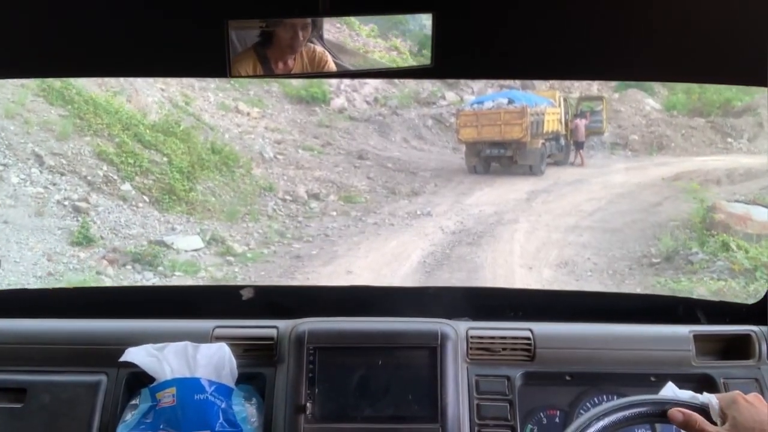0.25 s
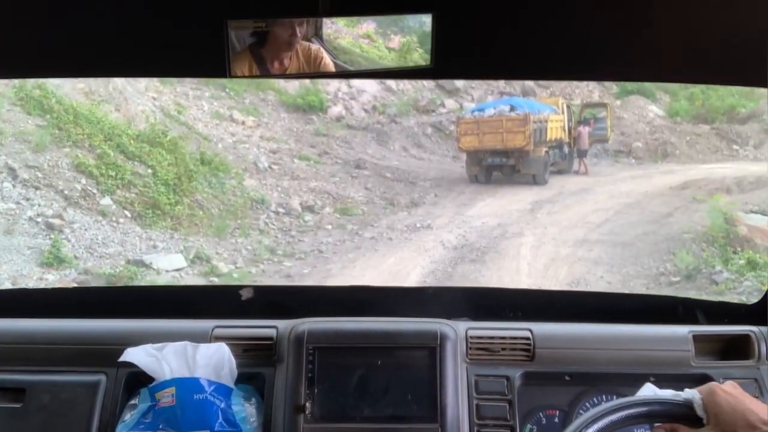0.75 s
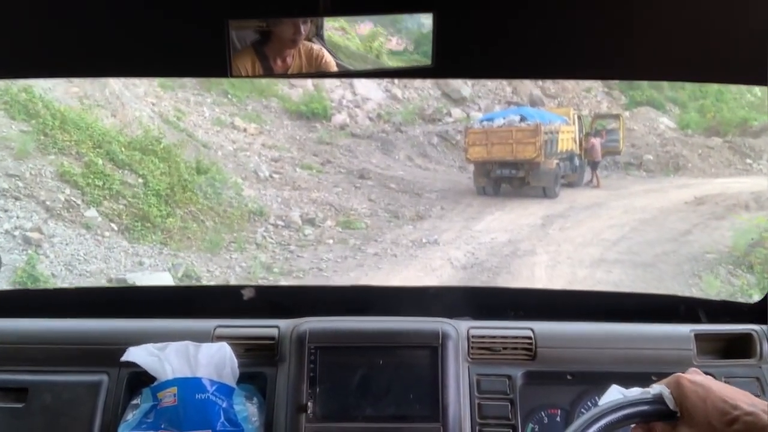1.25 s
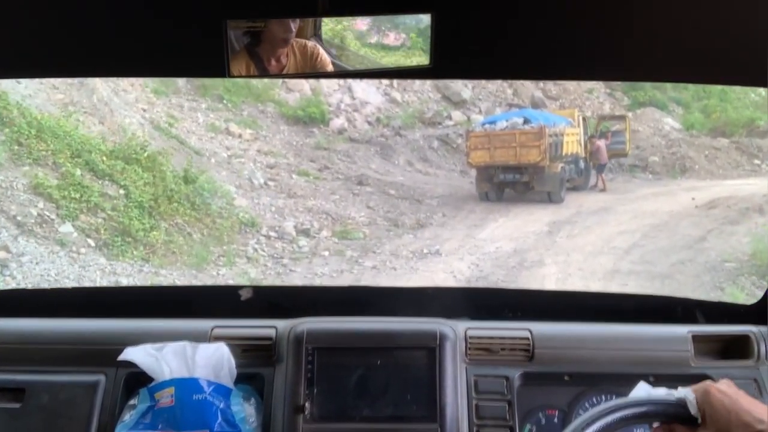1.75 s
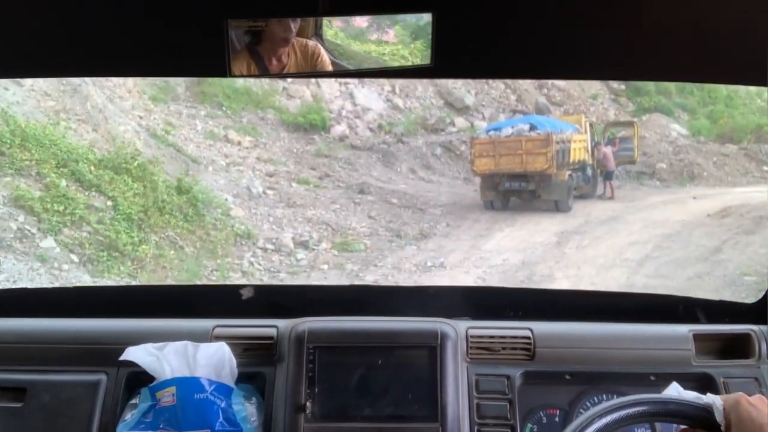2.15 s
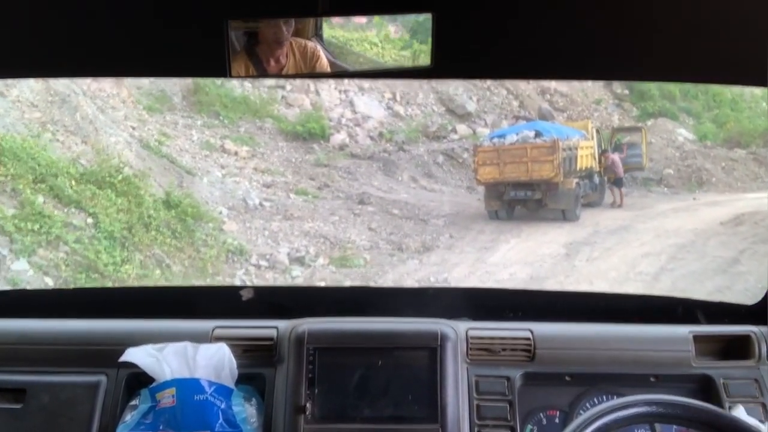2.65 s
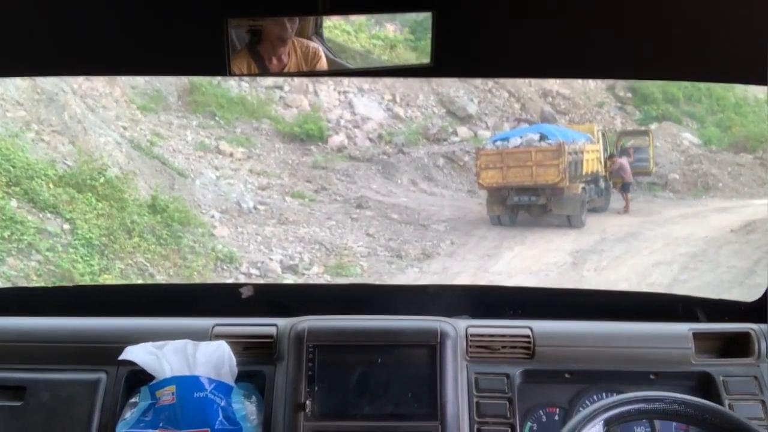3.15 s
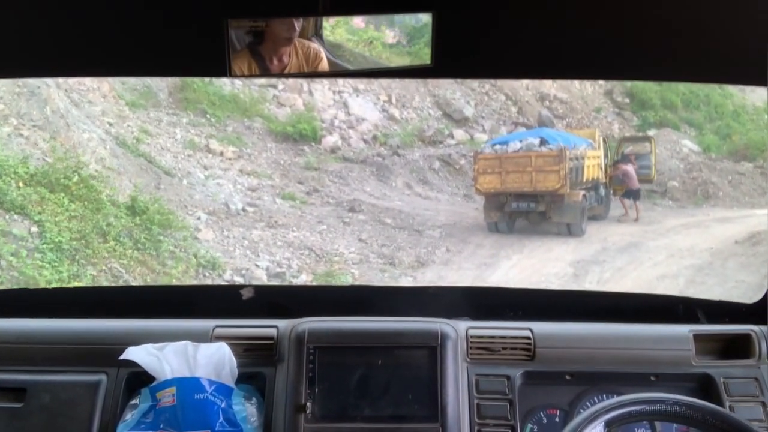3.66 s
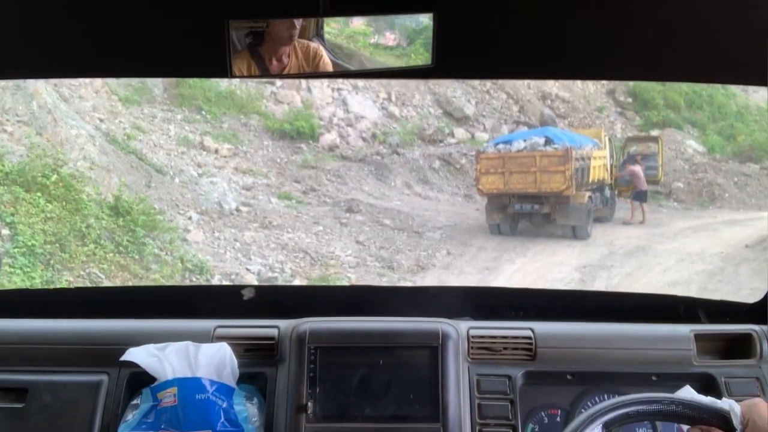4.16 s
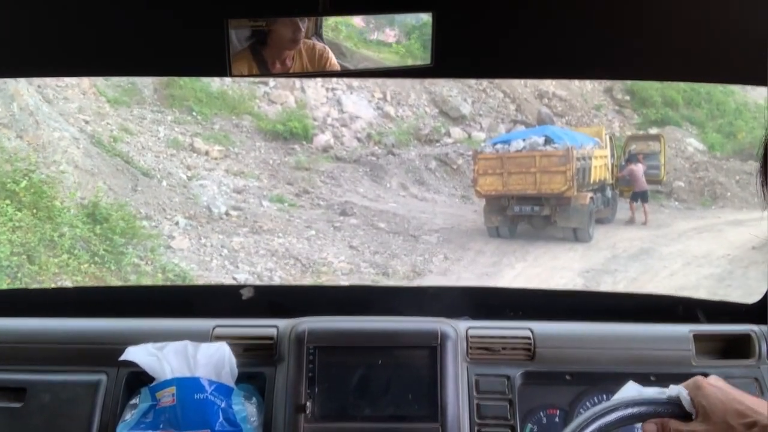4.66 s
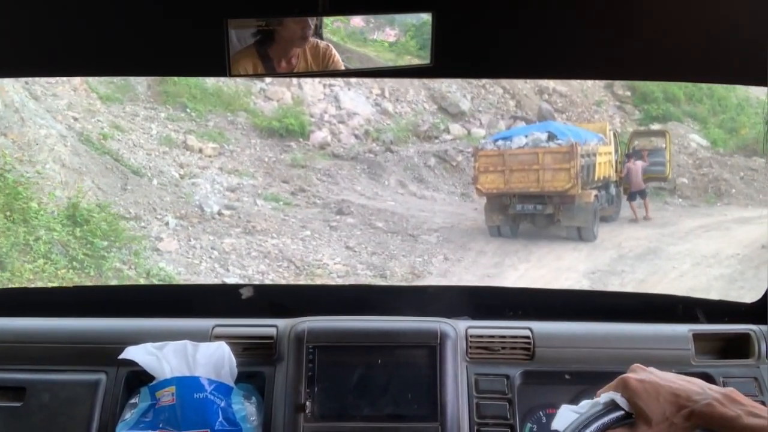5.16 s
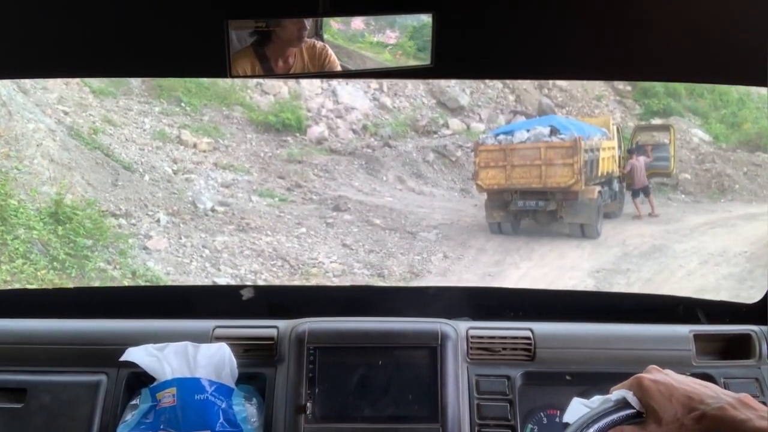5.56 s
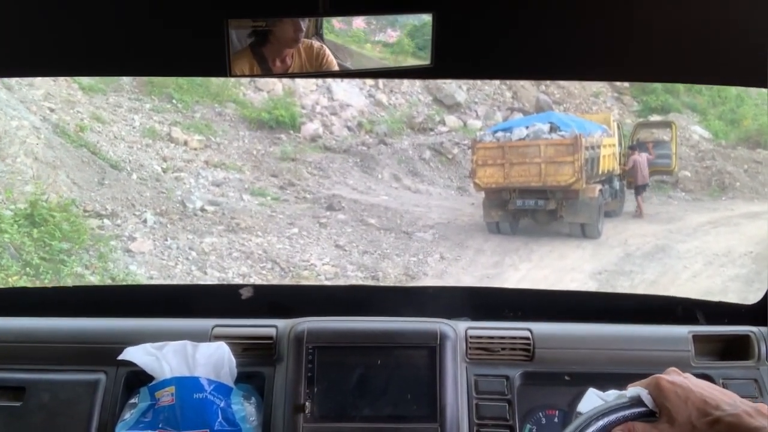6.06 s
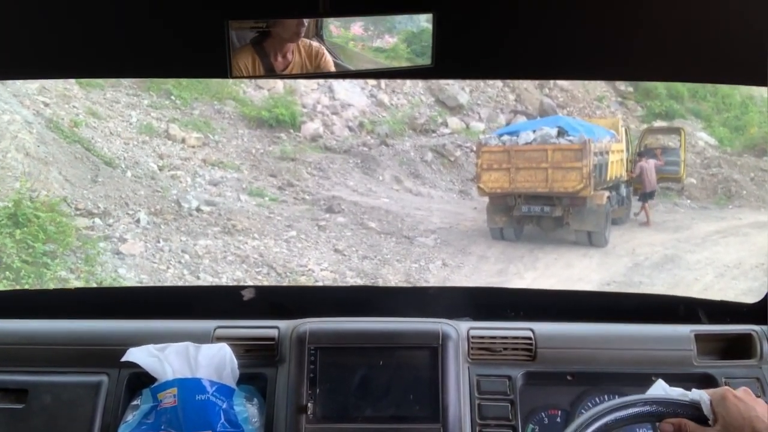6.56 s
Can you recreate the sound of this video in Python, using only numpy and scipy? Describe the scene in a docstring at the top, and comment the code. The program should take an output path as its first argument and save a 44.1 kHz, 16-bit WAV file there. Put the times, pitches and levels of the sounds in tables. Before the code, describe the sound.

A heavy diesel truck is heard from inside its cab, creeping along a dirt road. For the first 3 seconds the engine pulls at low revs with a deep, booming drone, wavering slightly in pitch. Road rumble and diesel clatter run beneath it, cab panels hum, and very faint puffs of air pulse with the engine. Loose trim knocks and rattles irregularly throughout, with clusters around 1.1 to 1.6 seconds and 2 to 3 seconds. From about 3 seconds the load eases, the panel hum fades and the revs drop in steps, a little quieter. Faint plastic squeaks come near 4 and 5.5 seconds, and a thin ring repeats about seven times a second from 3.7 to 6.1 seconds. The cab booms again around 4.5 and 5.3 seconds. The engine then runs near idle, with more trim knocks from 6.2 seconds until the end, just before 7.

```python
"""A heavy four-cylinder diesel truck, heard from inside the cab, creeps down a dirt road and slows to idle.
Multiples of the firing rate boom in the cab; road rumble and diesel clatter fill the middle.
Loose trim knocks and squeaks on the bumps, and a faint puff of air comes once an engine cycle.
The microphone is a phone in the cab. Left and right are alike in the bass and looser in the middle;
the treble is alternately in and out of phase."""
import sys
import numpy as np
from scipy import signal
from scipy.fft import rfft, irfft, next_fast_len
from scipy.io import wavfile
from scipy.ndimage import uniform_filter1d

SR = 44100
rng = np.random.default_rng(int(sys.argv[2]) if len(sys.argv) > 2 else 0)


def dump_mix(stems):
    """Bounce the given channels to the path in sys.argv[1] as a 16-bit WAV at rate SR."""
    frames = np.atleast_2d(stems).T  # one column per channel
    limited = np.clip(frames, -1, 1)  # hard clip at full scale
    pcm = np.round(limited * 32767).astype(np.int16)
    wavfile.write(sys.argv[1], SR, pcm)


N = 300321
T = np.arange(N) / SR
FFT_SIZE = next_fast_len(N, True)
BIN_HZ = np.arange(FFT_SIZE // 2 + 1) * SR / FFT_SIZE + 1e-3

# engine slowing to idle: time_s, firing_hz
FIRING_RATE = [(0, 36.2), (.25, 35.3), (.8, 37.9), (1.3, 37.8), (2, 35), (2.5, 35.9), (2.75, 36.9),
               (2.95, 35.8), (3.1, 32.2), (3.3, 31.6), (3.75, 31.6), (4.25, 28.3), (4.9, 28.4), (5.1, 25.8),
               (5.25, 24.3), (5.4, 23.7), (5.6, 24), (5.85, 25.4), (6.3, 25), (6.81, 22.5)]
# steady drone, by multiple of the firing rate: loaded_db, unloaded_db
DRONE_LEVELS = {1: (-26.5, -34.5), 2: (-36.5, -36), 3: (-38, -40), 4: (-45, -42), 8: (-54.5, -39),
                12: (-53, -56)}
# cab booms, by multiple of the firing rate: middle_s, hold_s, level_db
CAB_BOOMS = {1: [(.25, 0.078, -21.5), (.8, .3, -24.5), (1.5, 0.12, -22), (2.1, .45, -20), (2.5, .2, -21.5),
             (3.15, 0.34, -29), (3.5, .15, -32), (3.85, 0.27, -27.5), (4.9, 0.17, -28), (5.8, 0.09, -30)],
             2: [(.02, 0.048, -22.5), (1.15, .7, -27.5), (2.7, 0.18, -30), (3.92, 0.23, -29.5),
             (4.4, 0.18, -33.5), (5.325, .02, -18.5), (5.6, 0.057, -27.5), (5.83, 0.081, -33),
             (6.5, 0.32, -28)], 3: [(.15, 0.33, -29), (.95, 0.44, -29), (1.7, .45, -30.5), (2.2, 0.25, -35),
             (5.98, .1, -35), (6.1, 0.04, -29), (6.75, 0.11, -30.5)], 4: [(.3, 0.22, -40.5),
             (2.2, 0.23, -37), (2.75, 0.41, -37), (5.2, 0.17, -35), (4.3, 0.086, -30.5),
             (4.45, 0.18, -22.5), (4.62, 0.058, -31.5), (4.77, .16, -23.5), (5.9, 0.22, -33)],
             8: [(3.2, 0.21, -36.5), (4.65, 0.49, -38), (5.1, 0.048, -32), (5.5, 0.15, -34),
             (5.61, .03, -34), (5.725, 0.05, -27.5), (5.83, 0.049, -36), (5.925, 0.043, -27),
             (6.04, 0.12, -37.5), (6.22, 0.0036, -24)], 12: [(2.5, .1, -41.5), (5.3, 0.094, -45),
             (5.5, 0.13, -39), (5.64, .05, -42), (5.77, 0.12, -36.5), (6.33, 0.1, -44.5)]}
# two cab panels humming under load: time_s, pitch_hz, level_db
LOW_PANEL_HUM = [(0, 206.7, -40.5), (.35, 196, -34.5), (.62, 201.9, -33.5), (.9, 192.9, -40),
                 (1.2, 191.5, -36.5), (1.9, 209.3, -39.5), (2.45, 214.5, -40), (2.7, 210, -51)]
HIGH_PANEL_HUM = [(0, 300, -38.5), (.3, 294, -31.5), (.52, 303, -32.5), (.68, 306.3, -47.5),
                  (1.55, 300.8, -48), (1.7, 300, -38), (1.87, 299, -51), (2.1, 295.9, -39),
                  (2.4, 297.8, -45), (2.65, 292.2, -35), (3, 287, -36.5)]
# shaking of the cab by road and engine: time_s, rumble_db, rattle_db
CAB_SHAKE = [(0, -22.5, -44.5), (.1, -24.5, -45), (.2, -24, -45), (.3, -24.5, -43.5), (.45, -25.5, -45.5),
             (.6, -26, -46), (.8, -25.5, -48), (1.05, -26, -44.5), (1.14, -24, -44), (1.22, -22, -45.5),
             (1.3, -23, -39.5), (1.38, -24, -44.5), (1.52, -21, -45), (1.85, -27.5, -47), (2.1, -26, -46),
             (2.6, -24, -44.5), (2.95, -25.5, -46.5), (3.3, -29, -49), (3.6, -26.5, -46.5),
             (3.75, -27, -42.5), (4.05, -27.5, -46.5), (4.3, -27, -47.5), (5.2, -30, -48.5),
             (5.45, -27.5, -47), (5.7, -27.5, -46.5), (6.17, -29, -49), (6.24, -25, -46), (6.32, -29, -51),
             (6.63, -27.5, -43.5), (6.76, -24.5, -50), (6.81, -21.5, -45)]
# cab resonances: pitch_hz, width_hz, lift_db
CAB_MODES = [(47.6, 8.8, 7), (67, 8.7, 5.5), (76.6, 10, 6.5), (118.4, 27, 7.5), (147, 20, 6), (203, 24, 8),
             (293, 19, 7), (502, 9.1, 3), (830, 20, 7), (1087, 110, 7.5), (1465, 6.9, 5.5), (1950, 40, 6),
             (2235, 40, 2.5), (3330, 18, 2.5), (4230, 31, 5), (4760, 70, 4)]
# spectra of the noises in the cab: frequency_hz, gain_db
RUMBLE_SPECTRUM = [(15, -30), (24, -17), (33, -5.5), (50, 1.5), (75, -3), (92, -8), (170, -12),
                   (260, -14.5), (420, -29), (800, -54.5)]
CLATTER_SPECTRUM = [(150, -12), (330, -1), (500, -0.5), (700, -4.5), (1000, -13.5), (1500, -14),
                    (2500, -25), (5000, -49.5)]
RATTLE_SPECTRUM = [(700, -7.5), (1400, -0.5), (2200, -2), (3300, -5.5), (5000, -12), (7000, -15),
                   (10000, -35.5)]
HISS_SPECTRUM = [(3000, -14), (6000, 0), (8300, 2), (10500, -2), (11800, -6), (13000, -5.5), (15500, -5.5)]
PUFF_SPECTRUM = [(6000, -22), (9000, -8), (11000, 0), (11900, -6), (13000, 0), (15500, -3)]
# loose trim on bumps, rough peak of each mode group: time_s, low_db, middle_db, high_db
TRIM_KNOCKS = [(.105, -28, -31, -43), (.309, -42, -35, -46), (.829, -29.5, -41, -46),
               (1.106, -30, -31, -41), (1.128, -26.5, -31, -39), (1.155, -31, -39, -45),
               (1.175, -42, -43, -44), (1.261, -36, -34, -42), (1.284, -37, -27.5, -40),
               (1.302, -35, -28.5, -43.5), (1.316, -40, -37, -49), (1.533, -24.5, -30.5, -35),
               (1.556, -28, -37, -45), (1.683, -28.5, -36.5, -46), (2.075, -26, -38, -48),
               (2.098, -25, -39, -45), (2.125, -32, -40, -47), (2.15, -27, -39, -47),
               (2.185, -28.5, -38, -45), (2.255, -27.5, -45, -41), (2.441, -22, -42, -42.5),
               (2.471, -27.5, -45, -44), (2.5, -29, -46, -49), (2.529, -21, -31, -35),
               (2.559, -22.5, -48, -50), (2.575, -28.5, -48, -44), (2.617, -30, -42, -47),
               (2.76, -44, -28, -38.5), (2.811, -21, -37, -48), (2.839, -27.5, -37.5, -53),
               (2.872, -25.5, -41, -50), (2.909, -31.5, -41, -48), (3.02, -33, -36.5, -47),
               (3.303, -30.5, -37, -44.5), (3.709, -37, -42, -38), (3.739, -38, -45, -41.5),
               (3.804, -32.5, -40, -39), (3.959, -34.5, -37, -41), (4.478, -25.5, -35, -49),
               (5.269, -39, -42, -44.5), (5.399, -38, -46, -44), (5.42, -40, -42, -42.5),
               (5.443, -30.5, -40, -49.5), (5.479, -37, -40, -43), (5.827, -32.5, -37.5, -43.5),
               (6.098, -35, -42, -45), (6.208, -29, -41, -43), (6.228, -30, -36, -44),
               (6.249, -33, -40, -45), (6.279, -37, -39, -46), (6.37, -33, -40, -44),
               (6.419, -37, -45, -47), (6.436, -29.5, -45, -43), (6.47, -33, -42, -42),
               (6.492, -34, -41, -47), (6.557, -29, -37, -50), (6.612, -31, -35, -43),
               (6.635, -34.5, -40, -49), (6.685, -35, -38, -49), (6.721, -30.5, -36.5, -47),
               (6.779, -35, -37, -35)]
# trim modes in low, middle and high groups: pitch_hz, t60_s, gain_db
TRIM_MODES = [
    [(640, .04, -5), (740, .05, -3), (830, .07, 0), (910, .07, -1), (990, .06, -2), (1065, .06, -3),
     (1170, .035, -7)],
    [(1420, .04, -2), (1540, .03, -4), (1660, .03, -4), (1790, .05, 0), (1960, .045, 0), (2200, .035, -2),
     (2410, .035, 0), (2610, .028, -1), (2800, .022, -2)],
    [(3050, .022, -1), (3350, .028, 0), (3540, .028, 0), (3750, .022, -1), (3960, .022, -1),
     (4200, .028, -1), (4550, .025, -1), (4800, .025, -3), (5100, .015, -2), (5500, .012, -2),
     (6100, .008, -2)],
]
# cab shell modes: pitch_hz, t60_s, gain_db
SHELL_MODES = [(290, .05, 0), (340, .045, 0), (395, .045, 0), (445, .05, 0), (505, .05, 0), (560, .035, 0)]
# rubbing plastic: middle_s, pitch_hz, width_hz, level_db, half_length_s
PLASTIC_SQUEAKS = [(3.97, 2200, 45, -48, .06), (3.8, 2220, 60, -54, .1), (1.115, 2410, 60, -47, .015),
                   (1.128, 3350, 70, -50, .015), (1.165, 3540, 70, -49, .018), (3.92, 2850, 70, -55, .03),
                   (2.565, 6300, 140, -58, .008), (4.283, 4250, 600, -50, .013), (5.46, 900, 60, -43, .045),
                   (5.44, 3800, 700, -52, .05), (5.49, 2830, 60, -54, .035)]
# longer hisses of air: peak_s, level_db, rise_s, fall_s
AIR_HISSES = [(.03, -56.5, 0.055, 0.44), (2.55, -57, .12, .12), (3.73, -56, 0.034, .08),
              (3.86, -55.5, 0.054, 0.082), (5.19, -58, .03, 0.045), (5.83, -57.5, 0.036, 0.098),
              (6.22, -57, 0.0089, .05), (6.55, -55, 0.066, 0.089), (6.785, -45, 0.0066, .04)]
# a narrow ring that repeats near idle: peak_s, level_db
IDLE_RINGS = [(3.67, -56), (3.82, -48), (3.96, -45), (4.07, -48), (4.21, -44.5), (4.36, -51), (4.5, -46),
              (4.655, -47), (4.8, -49), (4.945, -50), (5.11, -52), (5.27, -57), (5.45, -53), (5.64, -49),
              (5.83, -51), (6.01, -55), (6.13, -52)]
# how alike left and right sound at each pitch, the treble alternately in and out of phase:
# frequency_hz, likeness (0-1), right_lead_rad, left_minus_right_db
STEREO_IMAGE = [(20, .99, 0, 3.5), (70, .9, 0, 3.5), (130, .88, 0, 3), (260, .6, 0, 2.3), (450, .3, .2, 2),
                (650, .35, 2.9, 2), (1400, .45, 2.6, 1.5), (2000, .4, 3.6, 3), (4100, .3, 6.3, 2),
                (6000, .4, 7.9, .5), (7000, .75, 8.9, 0), (7700, 1, 3 * np.pi, 0), (9000, 1, 3 * np.pi, 0),
                (10300, .75, 11, 0), (11700, 1, 4 * np.pi, 0), (13100, 1, 4 * np.pi, 0),
                (14300, .65, 14, 0), (15300, 1, 5 * np.pi, 0)]

LIFT_OFF_S, LIFT_OFF_EASE_S = 3.47, 0.61  # the engine load falls away around this moment
CLATTER_DB, HISS_DB, PUFF_DB = (-33, -37.5), (-61.5, -61), (-55, -72.5)  # loaded, unloaded


def engine_drone():
    """Multiples of the firing rate hold a steady level and swell for a while as the cab booms."""
    firing_hz = curves(FIRING_RATE)[0]
    fade_s, out = 0.034, 0
    for order, steady_db in DRONE_LEVELS.items():
        boom = 0
        for middle, hold, db in CAB_BOOMS[order]:
            outside_s = np.maximum(np.abs(T - middle) - hold / 2, 0)
            boom += undb(db) * np.exp(-(outside_s / fade_s) ** 2)
        level = np.maximum(undb(by_load(steady_db)), boom)
        out += level * tone(order * firing_hz, 0, waver_db=1.6)
    return out


def panel_hums():
    """Two cab panels hum under load, each fading over its last tenth of a second."""
    return sum(tone(*curves(hum), waver_db=2.5) * np.clip((hum[-1][0] - T) * 10, 0, 1)
               for hum in (LOW_PANEL_HUM, HIGH_PANEL_HUM))


def cab_shaking():
    """Road rumble, diesel clatter and grainy rattle sound through the cab modes, over a thin hiss."""
    rumble_db, rattle_db = curves(CAB_SHAKE)
    swing_db = rattle_db - rattle_db.mean()  # clatter and hiss partly follow the rattle
    cab = np.sqrt(1 + sum((undb(db) ** 2 - 1) * resonance(hz, width) ** 2 for hz, width, db in CAB_MODES))
    pulses = 1 + 0.42 * np.exp(-(firing_count() % 1) / 0.11)  # a kick at each firing
    shudder = walk(20)
    grains = undb(0.56 * uniform_filter1d(rng.exponential(size=N), 60) * np.sqrt(60))
    rumble = undb(rumble_db + 2 * walk(8)) * colour(noise(), cab * gains(RUMBLE_SPECTRUM))
    clatter = flicker(pulses * noise(), cab * gains(CLATTER_SPECTRUM), 0.53 * shudder, own_db=2.06)
    clatter *= undb(by_load(CLATTER_DB) + 0.44 * swing_db)
    rattle = flicker(pulses * grains * noise(), cab * gains(RATTLE_SPECTRUM), 1.4 * shudder, own_db=1.0)
    rattle *= undb(rattle_db)
    hiss_db = by_load(HISS_DB) + .5 * swing_db + 0.95 * shudder + 1.1 * walk(10)
    hiss = undb(hiss_db) * colour(noise(), gains(HISS_SPECTRUM))
    return rumble + clatter + rattle + hiss


def trim_knocks():
    """Each knock is a short chatter that rings the trim and the cab shell, with a new mix of modes."""
    t = np.arange(3072) / SR
    out = np.zeros((2, N + 2 * len(t)))
    faint_s = rng.uniform(.01, T[-1], 24)  # faint knocks at chance moments
    faint_db = (-39, -45, -50) + 2 * rng.standard_normal((len(faint_s), 3))
    times, low_db, middle_db, high_db = np.transpose(np.r_[TRIM_KNOCKS, np.c_[faint_s, faint_db]])
    count, rise_s, crest_db = len(times), .004, 7.5
    fall_s = np.clip(.014 + .0005 * (low_db + 35), .002, .05)  # heavier thuds chatter longer
    envelope = np.exp(-t / fall_s[:, None, None]) * np.minimum(t / rise_s, 1)
    shell_db = low_db - 3.5
    for modes, peak_db in zip(TRIM_MODES + [SHELL_MODES], (low_db, middle_db, high_db, shell_db)):
        hz, t60, mode_db = np.transpose(modes)[:, :, None]
        rings = undb(mode_db) * np.exp(-np.log(1000) * t / t60) * np.sin(2 * np.pi * hz * t)
        shape = (count, len(modes))
        weights = undb(2.2 * rng.standard_normal(shape)) * rng.choice([-1, 1], shape)
        chatter = rng.standard_normal((count, 2, len(t))) * envelope
        contact_db = 1.8 * rng.exponential(size=(count, 1, 48))  # the parts touch unevenly
        chatter *= np.repeat(undb(contact_db), 64, axis=2)
        hits = signal.fftconvolve(chatter, (weights @ rings)[:, None], axes=2)
        loudest_rms = np.sqrt(uniform_filter1d(hits ** 2, size=512).max(axis=2))
        hits *= (undb(peak_db - crest_db)[:, None] / loudest_rms)[:, :, None]
        for start, hit in zip(((times - rise_s) * SR).astype(int), hits):
            out[:, start:start + hit.shape[1]] += hit
    sizzle = bursts(times + 0.0044, high_db - 17, rise_s=0.011, fall_s=fall_s + 0.028)
    return out[:, :N] + sizzle * colour(noise(), gains(HISS_SPECTRUM))


def plastic_squeaks():
    """Plastic rubs and scrapes in bands of noise that swell and fade."""
    out = 0
    for middle, hz, width, db, half_length in PLASTIC_SQUEAKS:
        swell = undb(db) * np.exp(-((T - middle) / half_length) ** 2)
        out += swell * colour(noise(), resonance(hz, width) ** 2)
    return out


def idle_ring(hz=1444):
    """A narrow ring, part tone and part noise, repeats as the engine nears idle."""
    envelope = bursts(*np.transpose(IDLE_RINGS), rise_s=.015, fall_s=.032)
    line = tone(hz, 0, waver_db=2.0)
    breath = colour(noise(), resonance(hz, width_hz=70) ** 2)
    return envelope * (0.98 * line + .5 * breath)


def air_puffs():
    """Air puffs in the high treble once every four firings, with some longer hisses."""
    cycles = firing_count() / 4
    at = np.flatnonzero(np.diff(np.floor(cycles - .8)))  # 0.8 of the way through each cycle
    puff_db = by_load(PUFF_DB)[at] + 3.5 * rng.standard_normal(len(at))
    puffs = bursts(T[at], puff_db, rise_s=0.016, fall_s=0.028)
    hisses = bursts(*np.transpose(AIR_HISSES))
    return (puffs + hisses) * colour(noise(), gains(PUFF_SPECTRUM))


def firing_count():
    """Firings so far; the fraction is the place between two firings."""
    return np.cumsum(curves(FIRING_RATE)[0]) / SR


def by_load(levels_db):
    """A level that glides from loaded to unloaded as the engine eases off."""
    loaded, unloaded = levels_db
    load = .5 - .5 * np.tanh((T - LIFT_OFF_S) / LIFT_OFF_EASE_S)
    return unloaded + (loaded - unloaded) * load


def tone(hz, db, waver_db):
    """A sine that wavers in level and pitch; the second path carries it a quarter turn later."""
    turns = np.cumsum(hz * (1 + .004 * walk(15))) / SR + rng.random() - np.array([[0], [1 / 4]])
    waver = 0.6 * walk(12) + 0.74 * walk(30)
    return np.sqrt(2) * undb(db + waver_db * waver) * np.sin(2 * np.pi * turns)


def noise():
    """Two unrelated noises, one for each path into the cab."""
    return rng.standard_normal((2, N))


def colour(x, gain):
    """Filters x by a gain on each bin, to unit rms."""
    return unit_rms(irfft(rfft(x, FFT_SIZE) * gain, FFT_SIZE)[:, :N])


def flicker(x, gain, shared_db, own_db):
    """Colours x in half-octave bands whose levels wander together and each on its own."""
    spectrum = rfft(x, FFT_SIZE) * gain
    centres = np.arange(7, 14, .5)  # octaves above 1 Hz
    octave = np.clip(np.log2(BIN_HZ), centres[0], centres[-1])
    out = 0
    for centre in centres:
        window = np.clip(1 - 2 * np.abs(octave - centre), 0, 1)
        out += irfft(spectrum * window, FFT_SIZE)[:, :N] * undb(shared_db + own_db * walk(14))
    return unit_rms(out)


def bursts(peak_s, level_db, rise_s, fall_s):
    """Envelope of bursts that swell to a peak and die away."""
    out = np.zeros(N)
    for peak, gain, rise, fall in np.broadcast(peak_s, undb(level_db), rise_s, fall_s):
        near = slice(max(int((peak - 3 * rise) * SR), 0), int((peak + 7 * fall) * SR))
        late = T[near] - peak
        out[near] += gain * np.where(late < 0, np.exp(-(late / rise) ** 2), np.exp(-np.abs(late) / fall))
    return out


def walk(rate_hz):
    """Random steps, smoothed twice; spread near 1."""
    hold = int(SR / rate_hz)
    steps = np.repeat(rng.standard_normal(N // hold + 1), hold)
    return 1.332 * uniform_filter1d(uniform_filter1d(steps, hold), hold)[:N]


def resonance(hz, width_hz):
    """Gain of one mode on each bin."""
    return 1 / np.sqrt(1 + ((BIN_HZ - hz ** 2 / BIN_HZ) / width_hz) ** 2)


def over_hz(table):
    """A table's columns spread over the bins, along log frequency."""
    hz, *columns = np.transpose(table)
    return [np.interp(np.log(BIN_HZ), np.log(hz), column) for column in columns]


def curves(table):
    """A table's columns spread over time."""
    times, *columns = np.transpose(table)
    return [np.interp(T, times, column) for column in columns]


def gains(spectrum):
    return undb(over_hz(spectrum)[0])


def undb(db):
    return 10 ** (np.asarray(db) / 20)


def unit_rms(x):
    return x / np.sqrt(np.mean(x ** 2))


def scene():
    """The left side carries the first path; the right carries it phase-shifted, blended with the second."""
    cab = engine_drone() + panel_hums() + cab_shaking()
    cab += trim_knocks() + plastic_squeaks() + idle_ring() + air_puffs()
    first, second = rfft(cab, FFT_SIZE)
    likeness, lead_rad, balance_db = over_hz(STEREO_IMAGE)
    likeness = np.clip(likeness, 0, 1)
    pan = undb(balance_db / 2)
    right = likeness * first * np.exp(1j * lead_rad) + np.sqrt(1 - likeness ** 2) * second
    return irfft(np.array([first * pan, right / pan]), FFT_SIZE)[:, :N]


def record(dry):
    """The phone cuts the top steeply above 15650 Hz."""
    return signal.sosfilt(signal.ellip(10, .2, 70, 15650, fs=SR, output="sos"), dry)


dry = scene()
out = record(dry)
dump_mix(out)
```